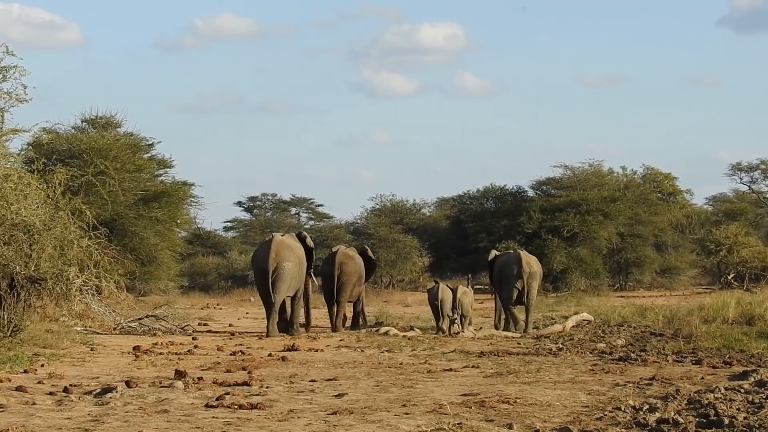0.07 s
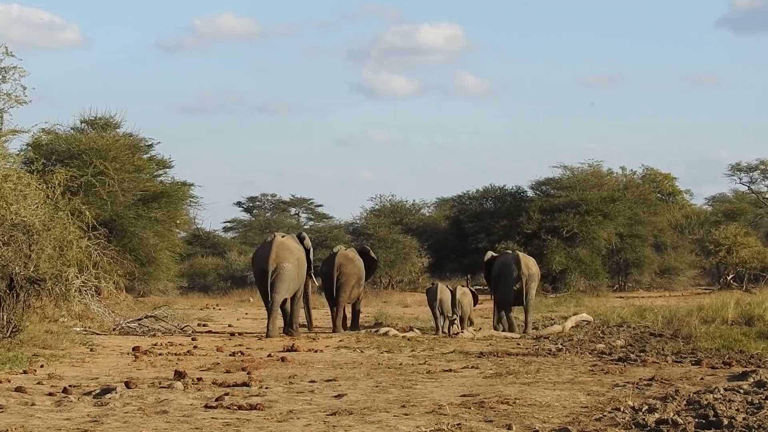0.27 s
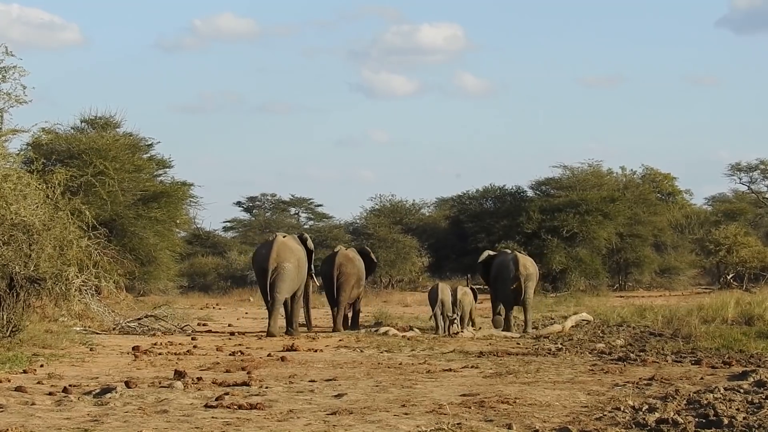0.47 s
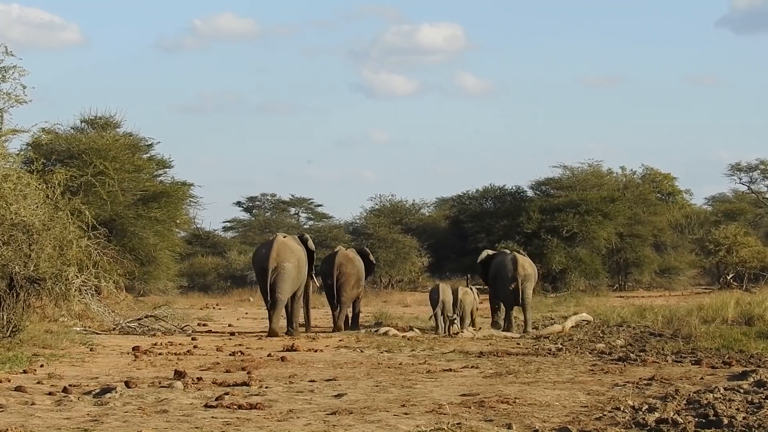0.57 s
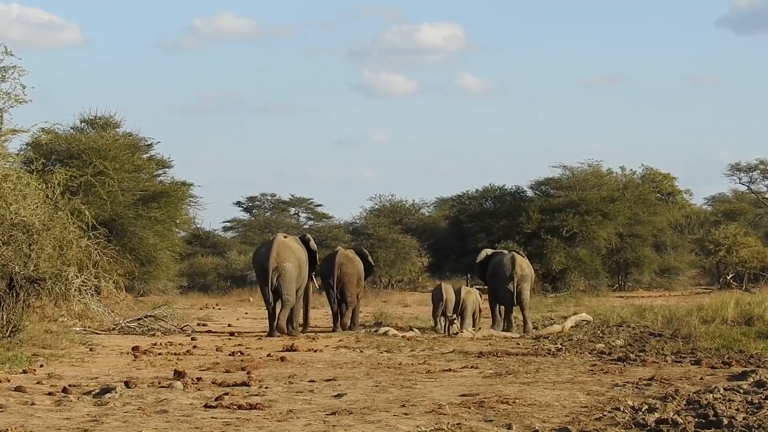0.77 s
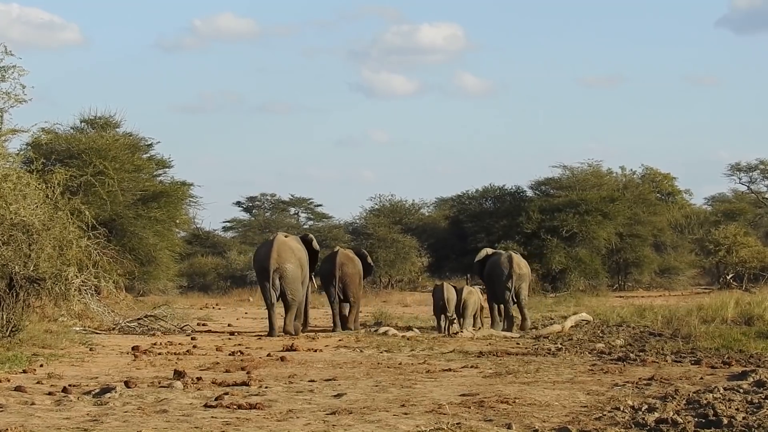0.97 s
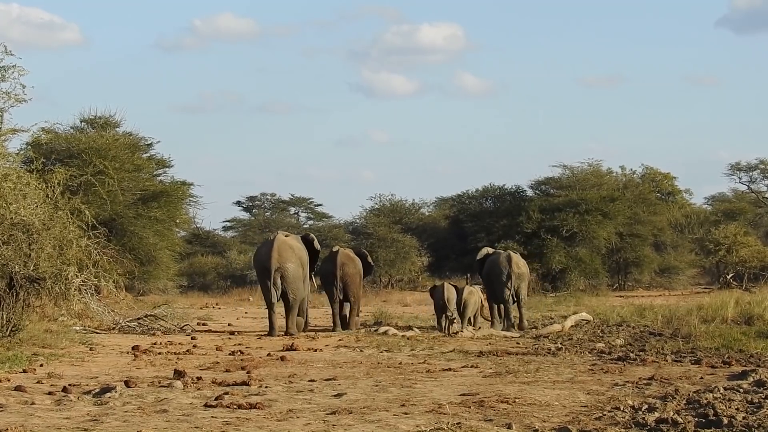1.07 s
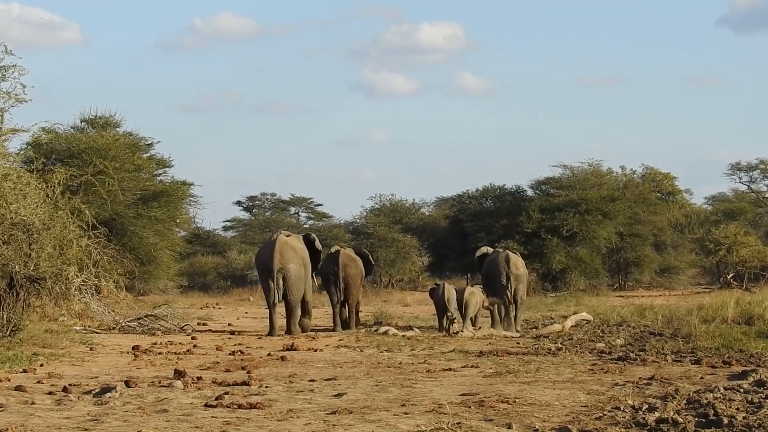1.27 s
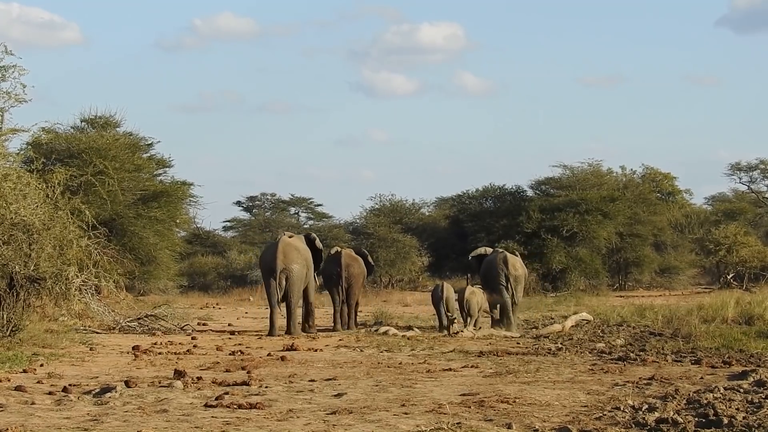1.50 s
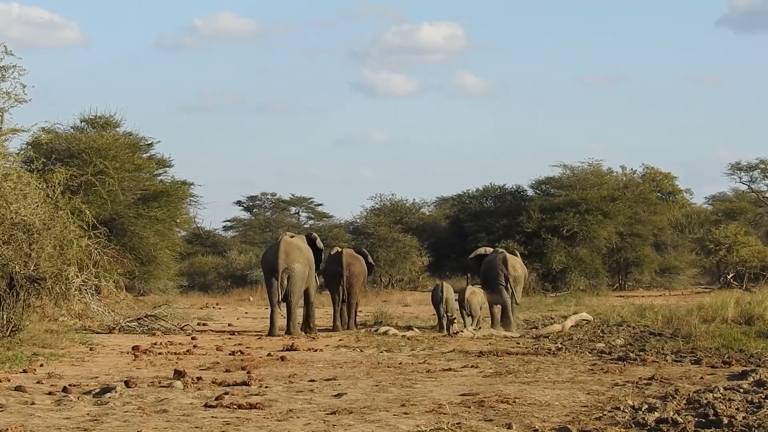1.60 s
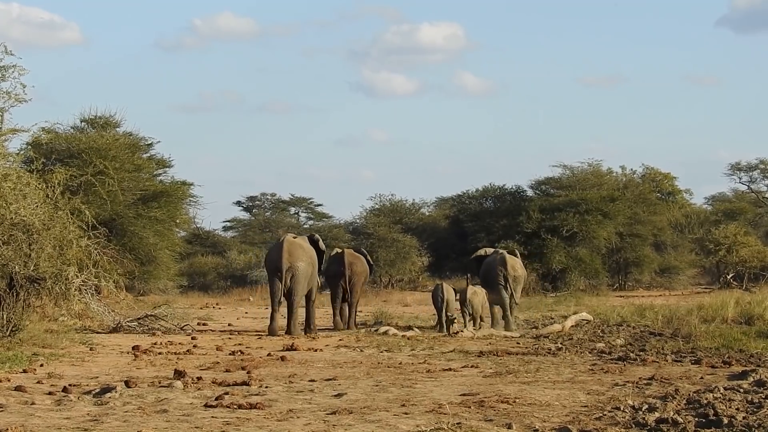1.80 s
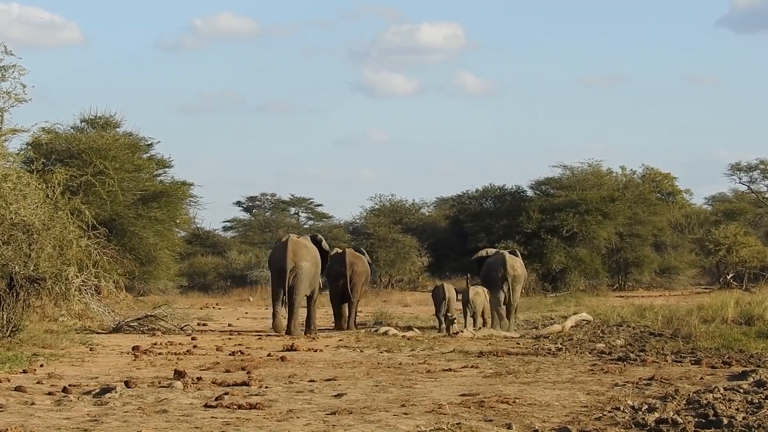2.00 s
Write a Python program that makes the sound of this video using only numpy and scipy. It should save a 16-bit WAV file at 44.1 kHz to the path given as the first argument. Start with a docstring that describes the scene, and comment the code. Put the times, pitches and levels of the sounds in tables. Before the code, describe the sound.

Quiet bush ambience runs throughout: a high insect hiss over a low wash of air, with crickets rasping in swelling phrases. Small birds chirp and peep from the start, busier after 1.4 seconds. At about 0.3 seconds the microphone mount gives a close cluster of soft thuds and rattles, the loudest moment. Dry ticks come around 1 second, and a second cluster of thuds lands near 1.7 seconds.

```python
"""Open bush on a calm day, heard through two close microphones. A low wash of air and a hissing insect
chorus run throughout, and small birds chirp from the start. Close by, a mount, probably being moved,
gives a cluster of soft thuds; its loose joint rattles, with a few dry ticks. Two bush crickets swell
and fade in rasping phrases, a small bird repeats a falling peep, and more ticks come around one second.
A second cluster of thuds and rattles lands near 1.7 seconds; birds and crickets carry on to the end."""
import sys
import numpy as np
from scipy import signal
from scipy.fft import rfft, irfft
from scipy.io import wavfile

SR = 44100
rng = np.random.default_rng(int(sys.argv[2]) if len(sys.argv) > 2 else 0)


def master(y):
    """Save y as 16-bit WAV."""
    cut = np.clip(np.atleast_2d(y).T, -1, 1)
    pcm = np.round(cut * 32767)  # scale
    wavfile.write(sys.argv[1], SR, pcm.astype(np.int16))


N = 90404
T = np.arange(N) / SR
BIN_HZ = np.arange(N // 2 + 1) * SR / N

# Tone of the air bed. Each row: frequency in Hz, relative level in dB.
AIR_SPECTRUM = [(20, -11), (40, -11), (65, 1), (110, 2.5), (200, 1), (320, -4.5), (600, -8), (1000, -10.5),
                (1500, -15), (2500, -17.5), (5000, -18), (9000, -25), (12000, -30), (15500, -37.5)]
# Stereo image of the air. Each row: frequency in Hz, left-right correlation.
AIR_CORRELATION = [(30, .0), (80, 0.12), (170, 0.34), (300, 0.43), (500, 0.2), (1000, 0.49), (2000, 0.29),
                   (6000, 0.23), (14000, 0.12)]
# Tone of the insect hiss. Each row: frequency in Hz, relative level in dB.
CHORUS_SPECTRUM = [(4800, -39), (5500, -10), (5850, -0.5), (6350, 1.5), (6900, -2.5), (7600, -6),
                   (8300, -13), (9500, -31.5)]
# Fader ride on the hiss. Each row: time in seconds, level in dB.
CHORUS_RIDE = [(0, -51.5), (.22, -51), (.36, -54), (.65, -51.5), (.95, -53.5), (1.4, -53), (2.05, -51.5)]
# Nearer birds. Each row: start and length in seconds, level in dB, first, middle and last pitch in Hz.
BIRD_CHIRPS = [(.0, 0.035, -54.5, 3910, 3200, 1800), (0.014, 0.033, -63, 3730, 3050, 2800),
               (1.444, 0.027, -52.5, 2280, 3740, 3540), (1.464, .022, -55, 3550, 3290, 3420),
               (1.52, 0.031, -60, 1806, 2350, 3300), (1.601, 0.018, -53.5, 2205, 2970, 3840),
               (1.608, 0.034, -54.5, 3760, 2990, 2240), (1.716, 0.0268, -54.5, 2604, 3554, 3290),
               (1.734, .026, -56.5, 3530, 2685, 2370), (1.735, 0.023, -56.5, 4220, 3660, 2710),
               (1.918, 0.024, -54, 6680, 6600, 5670), (1.955, .022, -53, 6250, 5750, 5360),
               (1.995, 0.045, -61, 2070, 2110, 2090)]
# One small bird's falling note. Each row: start in seconds, level in dB.
BIRD_PEEPS = [(0.418, -59.5), (.472, -62), (.912, -65), (.958, -61), (1.008, -60), (1.407, -62),
              (1.452, -59), (1.497, -55), (1.547, -56), (1.913, -57), (1.956, -58.5), (1.999, -58.5)]
# Pushes on the mount. Each row: start in seconds, level in dB, pitch in Hz.
MOUNT_BUMPS = [(0.05, -49.5, 134), (0.142, -45.5, 196), (.192, -39.5, 220), (0.231, -25.5, 202.6),
               (0.259, -34.5, 187), (0.278, -18, 190.5), (0.31, -32.5, 197), (.327, -37, 151),
               (0.349, -42, 160), (0.393, -48, 140), (0.571, -45, 202), (0.587, -47, 211),
               (0.947, -46, 197), (1.339, -34.5, 214), (1.3588, -47, 215), (1.6528, -23.5, 195.3),
               (1.673, -35.5, 227), (1.690, -36.5, 226.5), (1.704, -33, 220.7), (1.735, -43.5, 106),
               (1.961, -45, 222)]
# Body of a thud. Each row: pitch ratio, relative level in dB, length ratio.
MOUNT_MODES = [(.33, -30, 1.4), (.51, -20.5, 1.47), (0.769, -27, 3.4), (1.001, -0.5, 1.056)]
# Knocks of the joint. Each row: start in seconds, ring level in dB, pitch in Hz, click gain in dB.
JOINT_KNOCKS = [(.1915, -45.5, 1024, -60), (.2332, -37.5, 1010, -39.5), (.2585, -41, 1027, -42),
                (.2775, -39, 857, -42.5), (.283, -43, 1110, -67), (1.6533, -38.5, 1060, -38.5),
                (1.66, -45, 1096, -66), (1.699, -54, 1060, -70)]
# The joint's weaker modes. Each row: pitch in Hz, relative level in dB, rise in seconds.
JOINT_WEAK_MODES = [(440.5, -11.5, 0.0076), (617, -21.5, 0.0032), (1724, -20.5, 0.0041),
                    (2425, -17.5, 0.0026)]
# Tone of the joint's click. Each row: frequency in Hz, relative level in dB.
CLICK_SPECTRUM = [(250, 1), (600, 6), (1000, -0.5), (1400, -12), (2400, -2), (3500, -1), (4800, -12),
                  (9000, -27)]
# Faint rubs of the joint. Each row: peak time in seconds, level in dB.
JOINT_RUBS = [(.10, -60), (.425, -59.5), (.48, -66), (1.13, -60)]
# The main cricket. Each row: peak time in seconds, level in dB.
MAIN_CRICKET_PHRASES = [(.53, -57), (1.14, -53.5), (1.69, -57), (2.15, -55)]
# The thinner, higher cricket. Each row: peak time in seconds, level in dB.
THIN_CRICKET_PHRASES = [(.29, -64.5), (.85, -69), (1.50, -63), (2.03, -65)]
# Dry ticks. Each row: start in seconds, gain in dB, centre in Hz, decay in seconds.
DRY_TICKS = [(0.244, -47.5, 5570, .002), (0.272, -48, 6000, 0.0018), (0.2874, -37.5, 6320, 0.0025),
             (0.8718, -36.5, 5160, 0.0021), (0.878, -46.5, 4780, 0.0035), (1.0371, -34, 5160, 0.001),
             (1.0405, -38, 4930, 0.00069), (1.0572, -39.5, 4850, 0.00074), (1.0598, -39.5, 4640, 0.0022),
             (1.6636, -43, 5680, 0.0017)]


def undb(db):
    """Decibels to gain."""
    return 10 ** (np.asarray(db) / 20)


def unit(x):
    """Scale to rms 1."""
    return x / np.sqrt(np.mean(x ** 2))


def on_bins(points):
    """A curve over log frequency, read at every spectral bin."""
    hz, value = np.array(points, float).T
    return np.interp(np.log(BIN_HZ + 1), np.log(np.sort(hz)), value)


def noise(spectrum):
    """Noise coloured by (Hz, dB) points."""
    return unit(irfft(rfft(rng.standard_normal(N)) * undb(on_bins(spectrum)), N))


def resonate(x, hz, width_hz):
    """One steep resonance."""
    edges = np.clip([hz - width_hz / 2, hz + width_hz / 2], 20, SR / 2 - 20)
    return signal.sosfilt(signal.butter(2, edges, "bandpass", fs=SR, output="sos"), x)


def band(hz, width_hz):
    """Noise in one resonance."""
    return unit(resonate(rng.standard_normal(N), hz, width_hz))


def wander(rate_hz):
    """Smooth random drift with spread 1."""
    smoothing = np.exp(-(BIN_HZ / rate_hz) ** 2) * (BIN_HZ > 0)
    return unit(irfft(rfft(rng.standard_normal(N)) * smoothing, N))


def decay(start, fall_s):
    """An exponential fall that begins at the given time."""
    return (T >= start) * np.exp(-np.maximum(T - start, 0) / fall_s)


def swell(t, rise_s, shape):
    """Envelope of a ring that builds and dies; a higher shape tightens it."""
    return (t / rise_s * np.exp(1 - t / rise_s)) ** shape


def phrases(peaks, swell_s, fade_s):
    """An envelope that swells to each peak and fades."""
    return sum(undb(db) * np.exp(-((T - peak) / np.where(T < peak, swell_s, fade_s)) ** 2)
               for peak, db in peaks)


def add(out, start, x):
    """Mix a short sound in at the given time."""
    i = max(int(start * SR), 0)
    out[i:i + len(x)] += x[:max(N - i, 0)]


def place(x, lag_us, pan_db=0):
    """The left microphone hears the sound later; a positive pan makes it louder there."""
    left = irfft(rfft(x) * np.exp(-2j * np.pi * BIN_HZ * lag_us * 1e-6), N)
    return np.array([left * undb(pan_db / 2), x * undb(-pan_db / 2)])


def air():
    """A soft, wide bed of distant air and leaves, its level barely drifting."""
    correlation = on_bins(AIR_CORRELATION)
    mid = irfft(rfft(noise(AIR_SPECTRUM)) * np.sqrt(1 + correlation), N)
    side = irfft(rfft(noise(AIR_SPECTRUM)) * np.sqrt(1 - correlation), N)
    gain_db = -54.5 + 0.35 * wander(rate_hz=4)
    return np.array([mid + side, mid - side]) * undb(gain_db)


def insect_chorus():
    """Many distant insects merge into a hiss: fluttering on the right, smooth all around."""
    flutter = undb(3.2 * wander(rate_hz=47))
    near = place(noise(CHORUS_SPECTRUM) * flutter, lag_us=60.5, pan_db=-1.2)
    around = np.array([noise(CHORUS_SPECTRUM), noise(CHORUS_SPECTRUM)])
    level_db = np.interp(T, *np.array(CHORUS_RIDE).T)
    return unit(near + undb(-2.7) * around) * undb(level_db)


def whistle(length_s, pitches_hz, tremble):
    """One trembling bird note that bends through three pitches."""
    progress = np.linspace(0, 1, int(length_s * SR))
    bend_hz = np.polyval(np.polyfit([0, 0.5, 1], pitches_hz, 2), progress)
    hz = bend_hz * np.roll(tremble, rng.integers(N))[:len(progress)]
    envelope = np.abs(np.sin(np.pi * progress)) ** 0.19
    return envelope * np.sin(2 * np.pi * np.cumsum(hz) / SR)


def birds():
    """Raspy chirps and faint peeps, scattered by the bushes into a short echo."""
    chirps, peeps = np.zeros(N), np.zeros(N)
    tremble = 1 + 0.017 * wander(rate_hz=220)
    for start, length_s, db, *pitches_hz in BIRD_CHIRPS:
        add(chirps, start, undb(db) * whistle(length_s, pitches_hz, tremble))
    for start, db in BIRD_PEEPS:
        peep = whistle(length_s=0.0243, pitches_hz=(4810, 4640, 4220), tremble=tremble)
        add(peeps, start, undb(db) * peep)
    rasp = wander(rate_hz=257)
    chirps *= undb(1.5 * rasp)
    peeps *= undb(-2 * rasp)
    bushes = (rng.standard_normal((2, N)) * decay(start=0.0026, fall_s=0.015))[:, :SR // 5]
    echo = np.array([signal.fftconvolve(chirps + peeps, b / np.linalg.norm(b))[:N] for b in bushes])
    return place(chirps, lag_us=43) + place(peeps, lag_us=22) + undb(-1.5) * echo


def mount_thuds():
    """Each soft push swells and dies in the mount's low resonances."""
    out, t = np.zeros(N), T[:SR // 8]
    for start, db, hz in MOUNT_BUMPS:
        for pitch_ratio, mode_db, length_ratio in MOUNT_MODES:
            envelope = swell(t, rise_s=0.012 * length_ratio, shape=3.55)
            add(out, start, undb(db + mode_db) * envelope * np.cos(2 * np.pi * hz * pitch_ratio * t))
    return place(out, lag_us=19, pan_db=0.5)


def joint_rattle():
    """The loose joint knocks with a dull click and a hollow ring, and rubs faintly in between."""
    rings, clicks, t = np.zeros(N), np.zeros(N), T[:SR // 12]
    crack = noise(CLICK_SPECTRUM)
    main_rise_s, click_top_hz = 0.0031, 3900
    for start, db, hz, click_db in JOINT_KNOCKS:
        for mode_hz, mode_db, rise_s in [(hz, 0, main_rise_s), *JOINT_WEAK_MODES]:
            ring = swell(t, rise_s, shape=0.93) * np.sin(2 * np.pi * mode_hz * t)
            add(rings, start, undb(db + mode_db) * ring)
        clicks += undb(click_db) * crack * decay(start, fall_s=0.0014)
    dull_clicks = signal.sosfilt(signal.butter(4, click_top_hz, fs=SR, output="sos"), clicks)
    rubs = band(970, width_hz=230) * phrases(JOINT_RUBS, swell_s=0.022, fade_s=0.035)
    return place(rings + dull_clicks + rubs, lag_us=10, pan_db=2.5)


def wing_strokes(rate_hz, depth, jitter):
    """Slightly uneven wing strokes that pulse the level."""
    stroke_hz = rate_hz * (1 + jitter * wander(rate_hz=5.3))
    return unit(np.exp(depth * np.cos(2 * np.pi * np.cumsum(stroke_hz) / SR)))


def crickets():
    """Two bush crickets rasp their wings in pulsed phrases, off to the right."""
    main = unit(band(7950, width_hz=510) + undb(6) * band(7700, width_hz=670))
    main *= wing_strokes(30, depth=0.73, jitter=0.079) * wing_strokes(91, depth=0.6, jitter=0.145)
    main *= phrases(MAIN_CRICKET_PHRASES, swell_s=0.24, fade_s=0.12)
    thin = band(8550, width_hz=340) * wing_strokes(54, depth=0.3, jitter=0.1)
    thin *= phrases(THIN_CRICKET_PHRASES, swell_s=0.11, fade_s=0.08)
    return place(main, lag_us=52.5, pan_db=-1.5) + place(thin, lag_us=42.4, pan_db=-2)


def ticks():
    """Sharp, high ticks of narrow noise with a faint scattered tail."""
    out, t = np.zeros(N), T[:SR // 10]
    width_hz, tail_db, tail_s = 830, -20.5, 0.023
    for start, db, hz, fall_s in DRY_TICKS:
        grit = unit(resonate(rng.standard_normal(2 * len(t)), hz, width_hz))[len(t):]
        envelope = np.exp(-t / fall_s) + undb(tail_db) * np.exp(-t / tail_s)
        add(out, start, undb(db) * resonate(grit * envelope, hz, 2 * width_hz))
    return place(out, lag_us=26)


def scene():
    """The stereo mix: beds, wildlife and close knocks."""
    return air() + insect_chorus() + birds() + mount_thuds() + joint_rattle() + crickets() + ticks()


def record(dry):
    """A steep high cut takes off the very top."""
    top_hz = 15700
    return signal.sosfilt(signal.ellip(12, 0.1, 80, top_hz, fs=SR, output="sos"), dry)


dry = scene()
out = record(dry)
master(out)
```